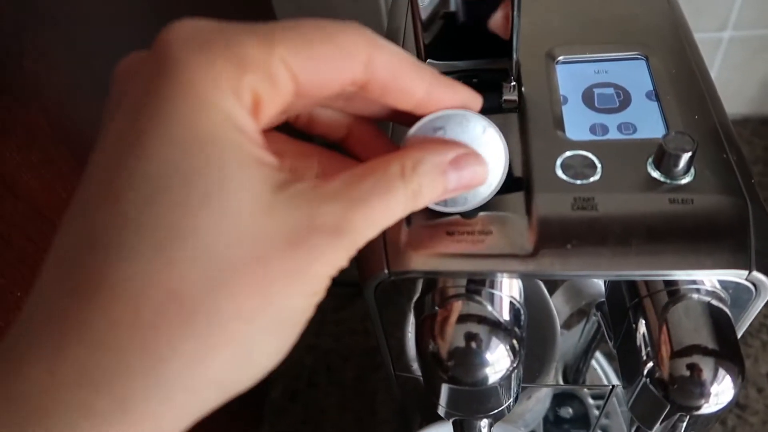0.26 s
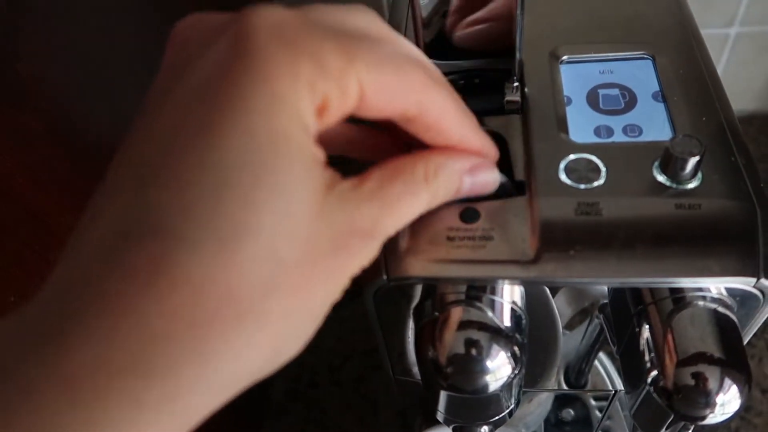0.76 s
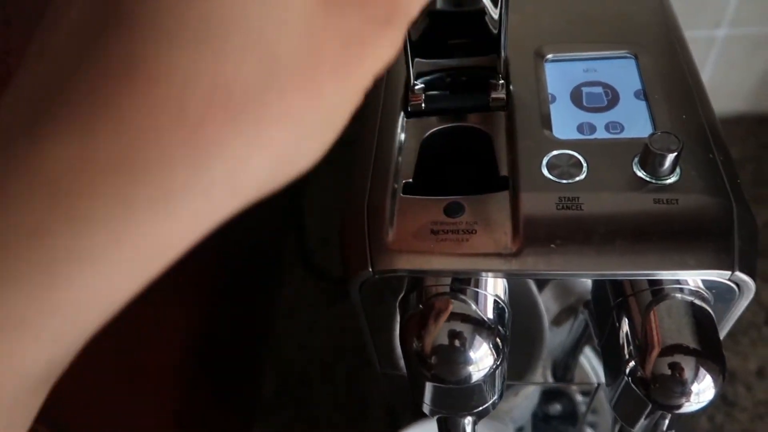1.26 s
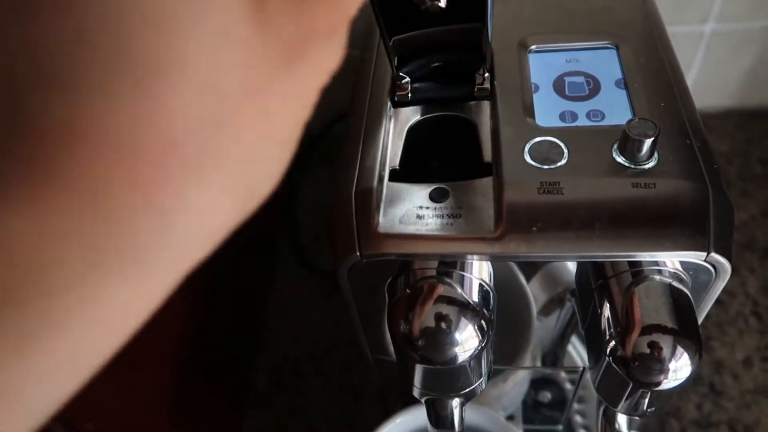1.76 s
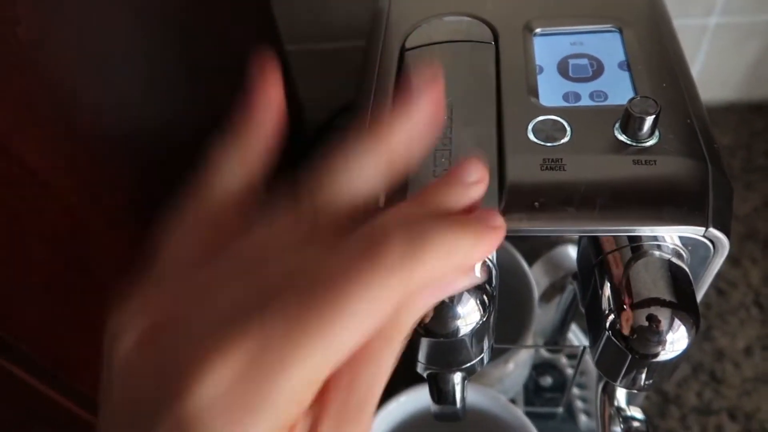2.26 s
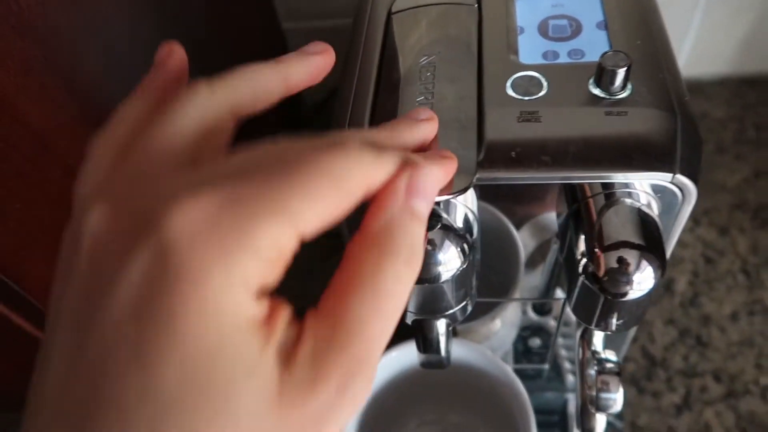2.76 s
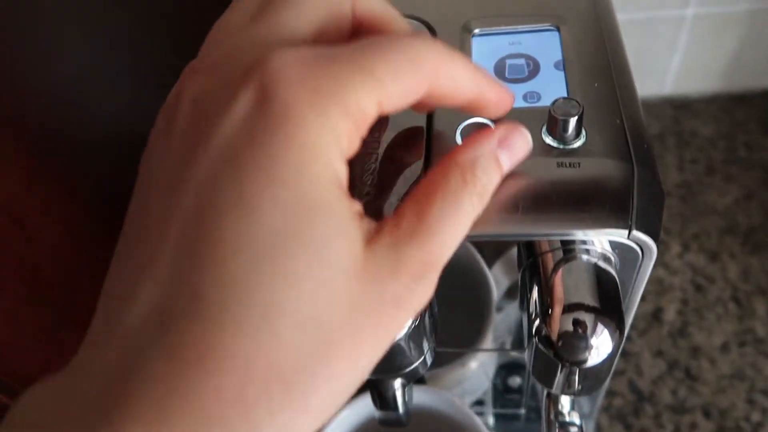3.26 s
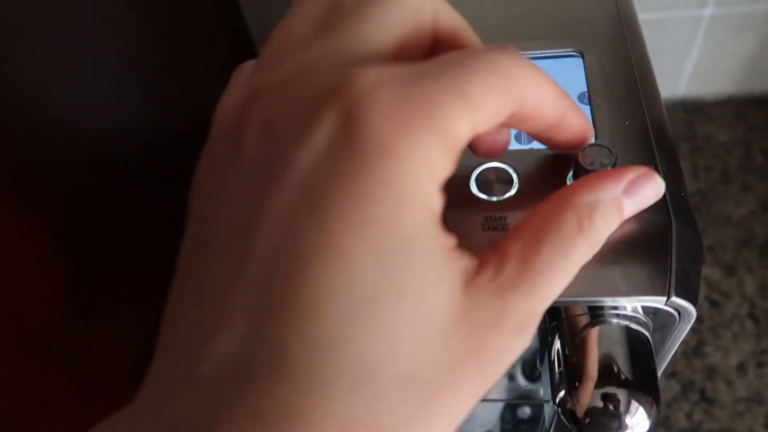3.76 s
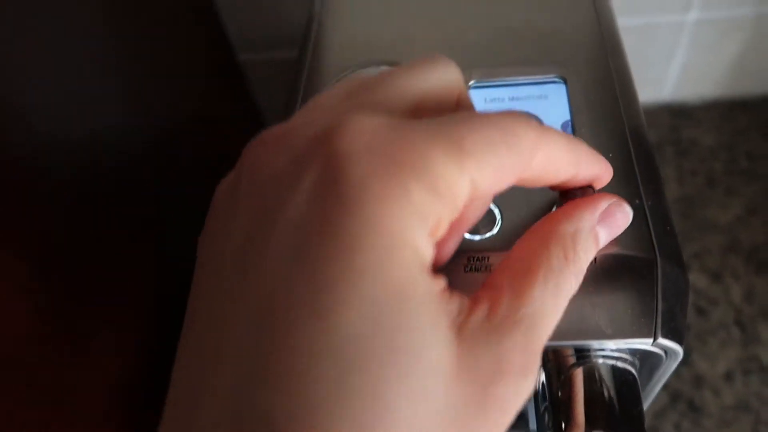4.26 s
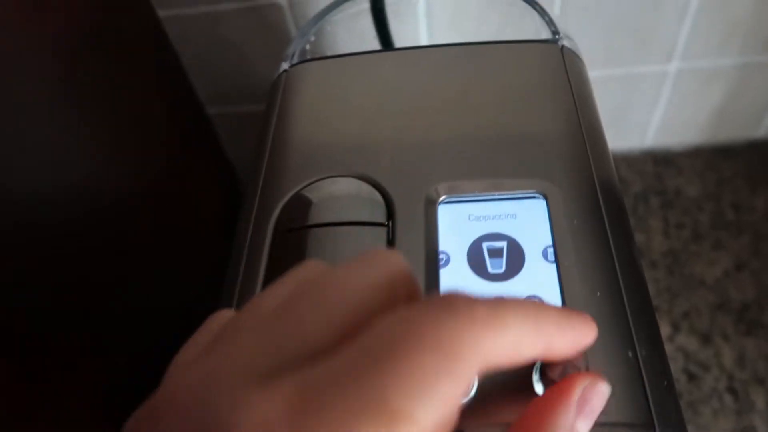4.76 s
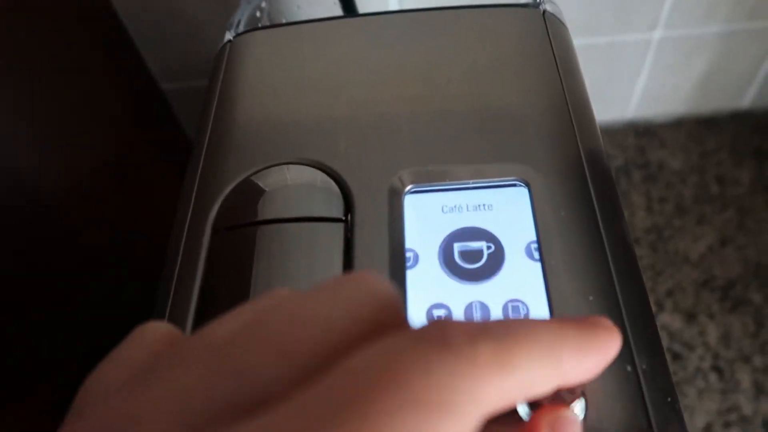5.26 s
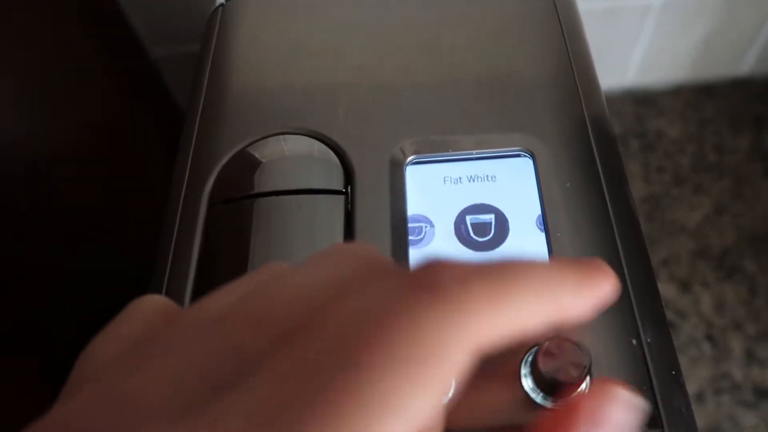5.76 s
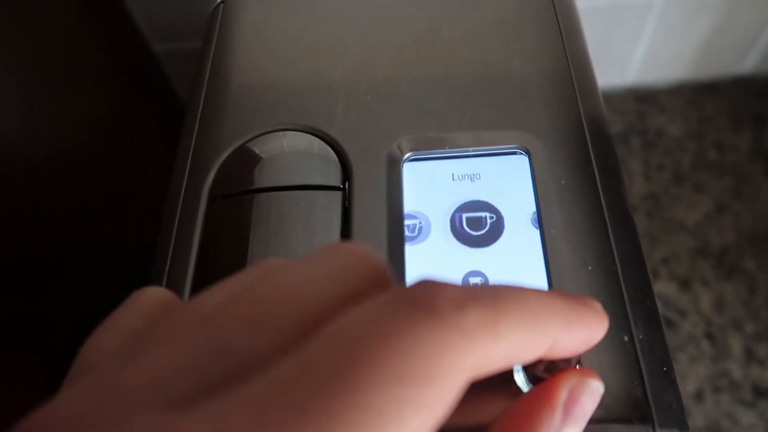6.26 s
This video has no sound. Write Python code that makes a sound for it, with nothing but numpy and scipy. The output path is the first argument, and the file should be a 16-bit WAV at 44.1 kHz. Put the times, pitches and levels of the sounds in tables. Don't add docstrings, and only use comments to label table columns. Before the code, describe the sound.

Close up in a quiet tiled kitchen, a foil capsule ticks and scrapes against a metal slot, then drops with a bright ringing clack. A loose lever rattles, swings with a scrape and slams very loudly with a hollow thump. A small latch click follows, then a pause, then faint dial clicks and finger rubbing over low room air and a distant fridge drone.

```python
import sys
import numpy as np
from scipy import signal
from scipy.fft import rfft, irfft, next_fast_len
from scipy.io import wavfile
from scipy.ndimage import uniform_filter1d

SR = 44100
rng = np.random.default_rng(int(sys.argv[2]) if len(sys.argv) > 2 else 0)


def persist_wave(psi):
    counts = np.round(np.clip(psi, -1, 1) * 32767).astype(np.int16)
    wavfile.write(sys.argv[1], SR, np.atleast_2d(counts).T)


def decibels_to_gain(level_db):
    exponent = np.asarray(level_db, float) / 20
    return 10 ** exponent


N = 287532

# (f/Hz, level/dB, t60/s)
HOUSING_MODES = [(135, -14, 0.11), (171.2, 1, 0.087), (310.13, 3.5, 0.15), (375.6, 8, 0.094),
                 (429.7, -9, 0.2), (548.25, -5.5, 0.147)]


def evened(x):
    return x / np.sqrt(np.mean(x ** 2) + 1e-20)


def read(points, hz):
    f, value = np.transpose(points)
    return np.interp(np.log(hz + 1), np.log(f + 1), value)


def add(mix, s, sound):
    part = mix[round(s * SR):][:len(sound)]
    part += sound[:len(part)]


def seconds(length):
    return np.arange(int(length * SR)) / SR


def build_up(t, rise_s):
    return 1 - np.exp(-t / rise_s)


def ring(modes, t):
    return sum(decibels_to_gain(db - 60 * t / t60) * np.sin(2 * np.pi * hz * t) for hz, db, t60 in modes)


def cluster(modes):
    return [(hz * (1 + 0.041 * rng.uniform(-1.2, 1)), db - 5.5 + 2 * rng.standard_normal(), t60)
            for hz, db, t60 in modes * 4]


def band(x, lo_hz, hi_hz):
    return signal.sosfilt(signal.butter(2, [lo_hz, hi_hz], "band", fs=SR, output="sos"), x)


def swell(count, depth_db, top):
    u = np.linspace(0, 1, count) ** (np.log(.5) / np.log(np.clip(top, .1, .9)))
    return decibels_to_gain(-depth_db * (2 * u - 1) ** 2) * signal.windows.tukey(count, .1)


def coloured_rattle(bounces, tone, fizz_db, t60, rise_s):
    hz, when, z = signal.stft(bounces, SR, nperseg=192, noverlap=144)
    shape_db = read(tone, hz)
    mid, top = (hz > 800) & (hz < 6000), hz > 6000
    top_db = 10 * np.log10(np.sum(decibels_to_gain(shape_db[top]) ** 2) / np.sum(decibels_to_gain(shape_db[mid]) ** 2))
    lift_db = fizz_db - top_db
    shape_db = shape_db + lift_db * np.clip((hz - 2800) / 4200, 0, 1)
    shape_db = shape_db - 30 * (hz < 400)
    dying = t60 * (2500 / (hz + 300)) ** 0.252
    z = z * decibels_to_gain(shape_db[:, None] - 60 * when / dying[:, None])
    rattle = signal.istft(z, SR, nperseg=192, noverlap=144)[1][:len(bounces)]
    return rattle * build_up(seconds(0.25), rise_s)


def knocks(rows, tone, modes, t60, rise_s, width_hz, focus_db, crack_db, grain_db):
    out, t, long = np.zeros(N), seconds(0.25), seconds(0.5)
    contact = 44
    own = ring(cluster(modes), long) * build_up(long, 0.01249)
    for s, peak_db, thump_db, fizz_db, ring_hz in rows:
        sizes = np.minimum(rng.exponential(1, len(t) // 30 + 1), 3)
        sizes = np.repeat(sizes, 30)[:len(t)]
        bounces = evened(rng.standard_normal(len(t)) * decibels_to_gain(grain_db * sizes))
        bounces[contact] += decibels_to_gain(crack_db)
        rattle = coloured_rattle(bounces, tone, fizz_db, t60, rise_s)
        spot = signal.lfilter(*signal.iirpeak(ring_hz, ring_hz / width_hz, SR), rattle)
        rattle = evened(rattle) + decibels_to_gain(focus_db) * evened(spot)

        detuned = [(f * rng.uniform(.94, 1.2), db + 3 * rng.standard_normal(), d)
                   for f, db, d in HOUSING_MODES]
        thump = ring(detuned, t) * build_up(t, 0.0053)
        blow = rattle / abs(rattle).max() + decibels_to_gain(thump_db - 2.0) * thump / abs(thump).max()
        add(out, s - contact / SR, decibels_to_gain(peak_db + 4.0) * blow)
        add(out, s, decibels_to_gain(peak_db) * own)
    return out


def slam():
    # (t/s, peak level/dB, housing thump level/dB, fizz above 6 kHz level/dB, ring f/Hz)
    slam_blows = [
        (2.384, -1.5, -14, -8, 3237),
        (2.3859, -9.5, -3, -15.5, 1061),
    ]
    # (t/s,
    # peak level/dB, thump level/dB, fizz level/dB, ring f/Hz)
    touches = [
        (1.0425, -35, -3.5, -48, 1800),
        (2.3195, -47.5, 6, -12.5, 3054),
        (2.3775, -29, -5.5, -14, 3974),
    ]
    # (f/Hz, density level/dB per Hz)
    slam_tone = [(290, -48.5), (500, 5), (761, -23.5), (1080, -5), (2360, -7.5), (3390, -10), (7100, -20.5),
                 (12000, -29), (16000, -39)]
    # (f/Hz, level/dB, t60/s)
    slam_modes = [(93.86, -23, 0.39), (135.46, -20.5, 0.52), (160.4, -22.5, 0.21), (190, -17.5, 0.054),
                  (304, -11, 0.19), (414.5, -21.5, 0.42), (1040, -16, 0.35), (1070, -24, 0.12),
                  (1626, -29.5, 0.16), (2070, -30.5, 0.34), (2630, -37.5, .3), (4110, -40, 0.46)]
    # (f/Hz, level/dB, t60/s)
    spring_modes = [(624, -38, 1.2), (1249, -41, 1.5), (1244, -50, 1.0)]
    out = knocks(slam_blows, slam_tone, slam_modes, t60=0.027, rise_s=0.0016, width_hz=760,
                 focus_db=-6, crack_db=12, grain_db=-2.0)
    out += knocks(touches, slam_tone, [], t60=0.1, rise_s=0.00068, width_hz=380,
                  focus_db=-6.5, crack_db=-17.5, grain_db=7.5)
    add(out, slam_blows[0][0], ring(spring_modes, seconds(1)))
    return out


def lever():
    # (t/s, peak level/dB, housing thump level/dB, fizz above 6 kHz level/dB, ring f/Hz)
    lever_knocks = [(1.566, -31.5, -17, -76, 1097), (1.585, -44.5, -17, -38.5, 1113),
                    (1.61, -40, 4.5, 3, 1670), (1.674, -37, -3, -39, 1390), (1.727, -37, -6.5, -14.5, 1090),
                    (1.738, -29, 1, -21, 2520), (1.748, -22, -6, -7, 3356), (1.754, -21, -14, -8.5, 1428),
                    (1.763, -29, -0.5, 0.5, 1390), (1.79, -34.5, 5.5, -16, 1320),
                    (1.878, -40.5, 2, -19, 1363), (1.982, -43, 6.5, -23.5, 1170),
                    (2.0225, -19, -13.5, -11.5, 2111), (2.029, -12.5, -13.5, -8.5, 2090),
                    (2.04, -18, 3, -11.5, 1150), (2.056, -27, 7, -15, 1927),
                    (2.065, -20, -9.5, -9.5, 906.3), (2.087, -28.5, 2.5, -38, 1300),
                    (2.1, -32, 1, -31.5, 993), (2.116, -34.5, 4, -28, 1050),
                    (2.14, -43.5, 3.5, -39.5, 1498)]
    # (f/Hz, density level/dB per Hz)
    lever_tone = [(290, -13.5), (500, 8), (729, -17.5), (1190, -2), (1600, -12.5), (2100, -8),
                  (2360, -12.5), (5970, -18.5), (16000, -35.5)]
    # (f/Hz, level/dB, t60/s)
    lever_modes = [(65.64, -27.5, 0.35), (97.5, -21.5, 0.4744), (551, -16.5, 0.34), (1116.4, -13.5, .2),
                   (1390, -27, 0.33), (2100, -17.5, 0.12)]
    return knocks(lever_knocks, lever_tone, lever_modes, t60=0.068, rise_s=0.0023, width_hz=95,
                  focus_db=-6.5, crack_db=15.5, grain_db=4.0)


def capsule():
    # (t/s, peak level/dB, housing thump level/dB, fizz above 6 kHz level/dB, ring f/Hz)
    capsule_knocks = [(0.2245, -33.5, -6, -23, 2350), (0.276, -24, -16.5, -9, 1210),
                      (0.555, -23, -22, 15, 7600), (0.5555, -17, -23.5, -7.5, 2194),
                      (0.626, -35, -6, -12.5, 3110), (0.748, -29, -16.5, -11, 2980),
                      (0.752, -31, -18.5, -30.5, 3920), (0.773, -24, -12, -13, 5920),
                      (0.781, -18, -14.5, -3.5, 1220), (0.829, -33.5, -11, -12, 1110),
                      (0.863, -28, -8, 0.5, 1030), (0.885, -33.5, -7, -3, 4230),
                      (0.897, -31, -10.5, 13, 3120)]
    # (f/Hz, density level/dB per Hz)
    capsule_tone = [(290, -30.5), (500, -12), (1080, -8), (1690, -8.5), (2100, -7.5), (2770, -9),
                    (8700, -7), (12700, -20.5), (16000, -26)]
    return knocks(capsule_knocks, capsule_tone, [], t60=0.0716, rise_s=0.00012, width_hz=540,
                  focus_db=-2, crack_db=13, grain_db=2.0)


def drop():
    # (t/s, peak level/dB, housing thump level/dB, fizz above 6 kHz level/dB, ring f/Hz)
    drop_knocks = [
        (1.059, -11.5, -16, 1.5, 3834),
        (1.237, -41.5, -5.5, 3, 1260),
    ]
    # (f/Hz, density level/dB per Hz)
    drop_tone = [(290, -55.5), (500, -2), (1460, -5.5), (1620, -11), (1840, -6), (2730, -14), (4150, -20.5),
                 (9220, -47), (11500, -34.5), (16000, -60.5)]
    # (f/Hz, level/dB, t60/s)
    chamber_modes = [(396.2, -33.5, 0.43), (1090, -21.5, 0.147), (3800, -46.5, .2), (3986, -40, 0.17),
                     (4400, -35.5, .2), (4700, -37, 0.12), (6000, -22.5, 0.093)]
    return knocks(drop_knocks, drop_tone, chamber_modes, t60=0.071, rise_s=0.00126, width_hz=1210,
                  focus_db=18.0, crack_db=9, grain_db=4.0)


def latch():
    # (t/s, peak level/dB, housing thump level/dB, fizz above 6 kHz level/dB, ring f/Hz)
    latch_clicks = [
        (2.75, -23, -14, -22, 2840),
        (2.789, -29, -34.5, -23, 2800),
        (2.812, -29.5, -31.5, -29, 2716),
    ]
    # (f/Hz, density level/dB per Hz)
    latch_tone = [(290, -35), (500, -6), (1440, -14), (2850, 1), (3200, -9), (5240, 2.5), (11500, -9),
                  (16000, -66.5)]
    # (f/Hz, level/dB, t60/s)
    latch_modes = [(2900, -34, 0.18), (2030, -16.5, 0.113), (363.3, -14.5, 0.217)]
    return knocks(latch_clicks, latch_tone, latch_modes, t60=0.0736, rise_s=0.00052, width_hz=210,
                  focus_db=-16.0, crack_db=20.5, grain_db=-6.5)


def dial():
    # (t/s, peak level/dB, housing thump level/dB, fizz above 6 kHz level/dB, ring f/Hz)
    dial_clicks = [(4.015, -42.5, -20, -12, 3130), (4.6, -31, -6, -15, 2350),
                   (4.987, -37.5, -24, -44, 2860), (5.013, -36.5, -1, -12, 1990),
                   (5.414, -39.5, -1.5, -16.5, 2900), (5.522, -47, 1, -19.5, 3130),
                   (5.53, -42.5, -2, -30.5, 1000), (5.83, -38, -4.5, -64.5, 1839),
                   (5.878, -34.5, -1.5, -5, 2690), (5.958, -27.5, -13.5, -0.5, 3060),
                   (5.972, -35, -27.5, -31, 5100)]
    # (f/Hz, density level/dB per Hz)
    dial_tone = [(290, -30), (500, 15.5), (2010, 3), (3150, 4), (4090, -7.5), (5550, -19), (9220, -63.5),
                 (13100, -35), (16000, -93)]
    # (f/Hz, level/dB, t60/s)
    dial_modes = [(1580, -2, 0.0747), (2014, -0.5, 0.058)]
    # (t/s, peak level/dB, ring f/Hz)
    fidgets = [(4.519, -50.5, 1620), (4.637, -48.5, 1820), (4.684, -43.5, 1325), (4.7, -46.5, 1270),
               (4.831, -45, 2170), (4.864, -49, 1580), (4.904, -44.5, 1576), (5.124, -48.5, 1565),
               (5.157, -44.5, 1070), (5.231, -49, 1600), (5.265, -48.5, 1580), (5.289, -48, 2030),
               (5.327, -44.5, 3120), (5.581, -46.5, 1040), (5.685, -51.5, 1070), (6.009, -47, 1580),
               (6.131, -59, 1680), (6.19, -49.5, 1570), (6.252, -53.5, 1230), (6.469, -55.5, 1970)]
    # (t/s, f/Hz, level/dB, t60/s)
    glint = (5.958, 12900, -57, .09)
    out = knocks(dial_clicks, dial_tone, dial_modes, t60=0.0583, rise_s=0.00544, width_hz=740,
                 focus_db=-2.5, crack_db=3.5, grain_db=4.5)
    thump_db, fizz_db = -4, -16.5
    shifts = [(s, peak_db, thump_db, fizz_db, hz) for s, peak_db, hz in fidgets]
    out += knocks(shifts, dial_tone, [], t60=.075, rise_s=0.0023, width_hz=200,
                  focus_db=0, crack_db=-4.5, grain_db=3.5)
    add(out, glint[0], ring(cluster([glint[1:]]), seconds(0.25)))
    return out


def pings():
    # (t/s, peak level/dB, f/Hz, t60/s)
    ping_events = [(0.2235, -35, 2600, 0.02), (0.2775, -38, 1218, 0.117), (0.2755, -36, 2625, 0.059),
                   (0.5542, -17.5, 2035, 0.0352), (0.5565, -33.5, 1101, 0.148),
                   (0.5545, -36.5, 1896, 0.116), (0.6255, -40, 2832, 0.039), (0.7805, -21.5, 1141, 0.0436),
                   (0.889, -29.5, 4160, 0.027), (1.0585, -17, 3589, 0.057), (1.059, -24, 4175, 0.088),
                   (1.0585, -17.5, 5754, 0.0275), (1.06, -33.5, 1823, 0.129), (1.566, -45.5, 1141, 0.034),
                   (1.584, -34, 1220, 0.03), (1.753, -22.5, 2032, 0.05), (1.752, -24, 3292, 0.0444),
                   (1.797, -42.5, 2040, 0.142), (2.0285, -18.5, 5610, 0.0258), (2.031, -18.5, 1239, 0.085),
                   (2.033, -31, 2080, 0.238), (2.067, -28.5, 5450, 0.0364), (2.068, -24, 999.4, 0.089),
                   (2.3845, -11.5, 3364, 0.028), (2.386, -15, 1079, 0.042), (2.388, -19.5, 1475, 0.066),
                   (2.416, -37.5, 1024, 0.22), (2.39, -35, 4200, 0.202), (2.396, -29, 1684, 0.172),
                   (2.7488, -38, 2814, 0.05), (2.789, -38, 2810, 0.062), (2.813, -45, 2800, 0.12),
                   (2.85, -46, 351.3, 0.6), (2.389, -21, 545.5, 0.139), (1.762, -44.5, 1390, 0.386),
                   (0.786, -37.5, 1219, 0.243), (0.73, -49, 3300, 0.104), (2.041, -43, 8550, 0.06),
                   (4.601, -39, 2270, 0.04), (4.702, -44, 2190, 0.052), (4.903, -42, 1603, 0.074),
                   (4.988, -50.5, 2766, 0.037), (5.826, -47, 2496, 0.034), (5.873, -46.5, 2900, .04),
                   (5.958, -32.5, 3150, 0.071), (5.958, -37.5, 5338, 0.057), (5.962, -45.5, 1499, 0.25)]
    out, t = np.zeros(N), seconds(0.25)
    for s, peak_db, hz, t60 in ping_events:
        add(out, s, ring([(hz, peak_db, t60)], t) * build_up(t, 0.0007))
    return out


def snaps():
    # (t/s, peak level/dB, low edge f/Hz, high edge f/Hz)
    snap_events = [(0.2231, -37, 4000, 10800), (0.2748, -25.5, 3000, 11960), (0.5549, -11, 5040, 13880),
                   (0.7577, -22.5, 3000, 14000), (0.7765, -9.5, 3990, 13150), (0.7796, -11, 3560, 12000),
                   (0.8295, -37, 2000, 8000), (0.8628, -24.5, 1500, 11000), (0.9021, -32.5, 2980, 12020),
                   (1.612, -50.5, 5000, 12000), (1.753, -26.5, 4000, 12000), (2.0215, -27.5, 6000, 15500),
                   (2.0295, -20, 4050, 14080), (2.385, -13, 5000, 14140), (4.599, -39, 4000, 9000),
                   (4.902, -52.5, 1200, 4000), (5.012, -37.5, 1200, 6500), (5.88, -37.5, 3000, 8100)]
    out, click = np.zeros(N), np.zeros(400)
    click[0] = 1
    click[round(.0009 * SR)] = -0.69
    for s, peak_db, lo_hz, hi_hz in snap_events:
        snap = band(band(click, lo_hz, hi_hz), lo_hz, hi_hz)
        add(out, s, decibels_to_gain(peak_db) * snap / abs(snap).max())
    return out


def scrape(length, low_db, bright_db, fizz_db):
    count = round(length * SR)
    sizes = decibels_to_gain(1.9 * np.minimum(rng.exponential(1, count), 3))
    slips = rng.standard_normal(count) * sizes * (rng.random(count) < .09)
    low = evened(band(slips, 610, 2480))
    bright = decibels_to_gain(bright_db) * evened(band(slips, 1810, 6360))
    fizz = decibels_to_gain(fizz_db) * evened(band(slips, 5000, 12000))
    return decibels_to_gain(low_db) * (low + bright + fizz)


def slides():
    # (t/s, length/s, low scrape level/dB, bright level/dB, fizz level/dB)
    run_ins = [
        (0.515, 0.0396, -24.5, -28.5, -31),
        (0.715, 0.031, -34, -13, -9),
        (1.047, 0.0085, -32.5, -20, -34),
        (1.584, 0.0125, -55, -15, -12.5),
        (1.696, 0.046, -22.5, -11.5, -25.5),
        (1.961, 0.0726, -22.5, -8, -19.5),
        (2.318, 0.0766, -27.5, -8.5, -22.5),
    ]
    # (t/s, length/s, low level/dB, bright level/dB, fizz level/dB)
    free_slides = [(0.678, 0.045, -55.5, 3.5, 1.5), (0.798, 0.1074, -59, 12.5, -2.5),
                   (1.0, 0.0562, -47.5, 5, -16.5), (.742, 0.0343, -40, 7, -1.5),
                   (0.874, 0.0405, -50.5, 8, -7.5), (1.545, 0.0253, -53, -19.5, -32),
                   (1.722, 0.144, -54, -6, -15.5), (2.03, 0.123, -41.5, -10, -27.5),
                   (2.402, .12, -48, 0, -13), (1.655, 0.043, -44, -31, -24.5),
                   (4.679, 0.0865, -54.5, -5, -9), (5.539, 0.062, -67.5, 4, 6.5),
                   (6.13, 0.12, -56.5, -19, -32)]
    out = np.zeros(N)
    for s, *stroke in run_ins:
        sound = scrape(*stroke)
        pressure = np.linspace(0, 1, len(sound)) ** 1.8
        add(out, s, sound * decibels_to_gain(28 * (pressure - 1.0)))
    for s, *stroke in free_slides:
        sound = scrape(*stroke)
        add(out, s, sound * swell(len(sound), depth_db=17, top=0.6))
    return out


def grip():
    # (t/s, length/s, level/dB, share of the stroke before its top)
    grip_strokes = [(1.189, 0.1297, -42.5, 0.595), (1.514, 0.106, -45, 0.536), (1.69, 0.0426, -40, 0.62),
                    (2.741, 0.309, -47, 0.287), (4.81, 0.126, -51.5, 0.54), (4.969, 0.054, -53.5, 0.42),
                    (5.067, 0.194, -59, 0.375), (5.948, 0.044, -46.5, 0.28), (6.092, 0.14, -54, 0.38),
                    (6.207, 0.45, -55.5, 0.34)]
    out = np.zeros(N)
    body = ring(cluster(HOUSING_MODES[2:5]), seconds(0.25))
    rubbed = evened(signal.oaconvolve(rng.standard_normal(N), body)[:N])
    for s, length, level_db, top in grip_strokes:
        part = rubbed[round(s * SR):][:round(length * SR)]
        add(out, s, decibels_to_gain(level_db) * part * swell(len(part), depth_db=28.5, top=top))
    return out


def bumps():
    # (t/s, peak level/dB, f/Hz, t60/s, rise/s)
    counter_bumps = [(1.612, -35.5, 184.3, 0.252, .01), (1.735, -33, 111, .12, .008),
                     (1.755, -30.5, 187.4, 0.167, .01), (2.024, -27.5, 62, 0.164, .008),
                     (2.03, -32, 114.7, 0.084, .008), (2.078, -19, 130, 0.13, .01),
                     (2.092, -27.5, 58, 0.16, .01), (2.15, -37.5, 117.4, .25, .01),
                     (2.3865, -1.5, 177, 0.0573, .001), (1.059, -29.5, 286.7, 0.14, .003),
                     (2.04, -28, 290, .12, .005), (5.097, -28.5, 85.7, 0.126, .02)]
    out, t = np.zeros(N), seconds(0.25)
    for s, peak_db, hz, t60, rise_s in counter_bumps:
        add(out, s, ring([(hz, peak_db, t60)], t) * build_up(t, rise_s))
    return out


def ports(x):
    # (f/Hz, phase/rad)
    port_lead = [(60, 0), (1500, -.1), (4500, -.4), (7000, -1.1), (10000, -1.7), (15000, -2.2)]
    # (f/Hz, level/dB)
    port_tilt = [(200, 0), (700, -.4), (1400, -1.1), (2800, -.7), (10000, -.7), (14000, 0)]
    size = next_fast_len(N)
    hz = np.fft.rfftfreq(size, 1 / SR)
    half = decibels_to_gain(read(port_tilt, hz) / 2) * np.exp(.5j * read(port_lead, hz))
    return irfft(rfft(x, size) * np.array([half, 1 / half]), size)[:, :N]


def kitchen(x):
    # (f/Hz, t60/s)
    room_decay = [(100, 0.344), (400, 0.47), (2000, 0.623), (5000, 0.42), (12000, 0.24)]
    hz, t, z = signal.stft(x, SR, nperseg=512, noverlap=384)
    power = np.abs(uniform_filter1d(abs(z) ** 2, size=11, axis=0))
    power = np.roll(power, 3, axis=1)
    power = power / (1 + (hz[:, None] / 4800) ** 3)
    keep = decibels_to_gain(-120 * t[1] / read(room_decay, hz))
    stored = np.array([signal.lfilter([1 - k], [1, -k], p) for k, p in zip(keep, power)])
    a, b = rng.standard_normal(z.T.shape + (2, 2)).T
    noise = a + 1j * b
    alike = np.clip(0.99 + 60 / (hz + 100) - hz / 30000, 0, 1)[:, None]
    pair = alike * noise[0] + np.sqrt(1 - alike ** 2) * np.array([noise[1], -noise[1]])
    return signal.istft(pair * np.sqrt(stored), SR, nperseg=512, noverlap=384)[1][:, :N]


def room_air():
    # (f/Hz, density level/dB per Hz)
    air_tone = [(13, -46.5), (22, -4.5), (44, -3.5), (70, -9), (122, -4.5), (200, -10.5), (286, -7),
                (420, -9.5), (618, -17), (1100, -17), (1540, -20), (1760, -20), (5930, -30), (13900, -44.5),
                (16000, -70.5)]
    # (f/Hz, correlation)
    air_likeness = [(60, 1), (130, 0.906), (290, 0.348), (640, -0.17), (1410, -0.44), (3100, -0.19),
                    (6820, -0.28), (15000, -0.12)]
    # (f/Hz, width/Hz, level/dB)
    fridge_lines = [(41.2, 5, -59.5), (118.47, 12, -57)]
    frames, hz = N // 512 + 5, np.fft.rfftfreq(2048, 1 / SR)
    a, b, c, d, patches = rng.standard_normal((frames, 1025, 5)).T
    patches = evened(uniform_filter1d(uniform_filter1d(patches, 12, 0), 8, 1))
    same = np.clip(read(air_likeness, hz), -1, 1)[:, None]
    left = a + 1j * b
    right = same * left + np.sqrt(1 - same ** 2) * (c + 1j * d)
    z = np.array([left, right]) * decibels_to_gain(read(air_tone, hz)[:, None] + 0.48 * patches)
    air = signal.istft(z, nperseg=2048, noverlap=1536)[1][:, :N]
    drone = sum(decibels_to_gain(db) * evened(band(rng.standard_normal(N), f - w / 2, f + w / 2))
                for f, w, db in fridge_lines)
    return decibels_to_gain(-50) * evened(air) + drone


def scene():
    near = capsule() + drop() + lever() + slam() + latch() + dial()
    near += slides() + grip() + bumps() + pings() + snaps()
    return ports(near) + decibels_to_gain(-10.0) * kitchen(near) + room_air()


def band_limit(x):
    return signal.sosfilt(signal.butter(12, 16510, fs=SR, output="sos"), x)


def record(dry):
    power = uniform_filter1d((dry ** 2).mean(0), 800, origin=399)
    power_db = 10 * np.log10(np.abs(power) + 1e-12)
    fall = np.arange(N) * 15.3 / SR
    held_db = np.maximum.accumulate(power_db + fall) - fall
    over_db = np.maximum(held_db + 23.0, 0)
    late_db = uniform_filter1d(over_db, 2000, origin=999)
    ducked = dry / decibels_to_gain(0.46 * late_db)
    mix = np.clip(ducked, -.88, .88)
    mix = signal.sosfilt(signal.butter(2, 30, "high", fs=SR, output="sos"), mix)
    mix = signal.oaconvolve(mix, signal.firwin(255, 16500, fs=SR)[None], "same")
    return band_limit(mix)


dry = scene()
out = record(dry)
persist_wave(out)
```